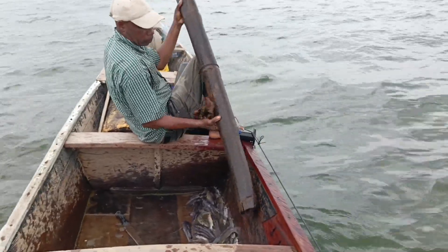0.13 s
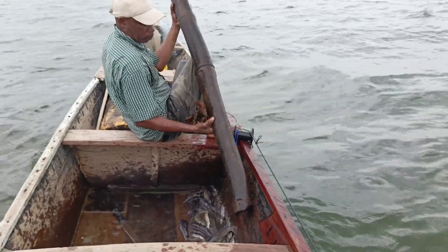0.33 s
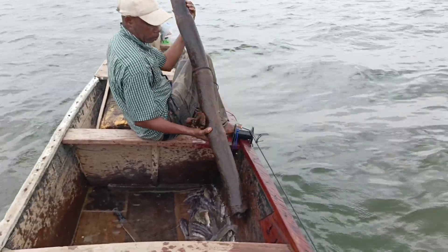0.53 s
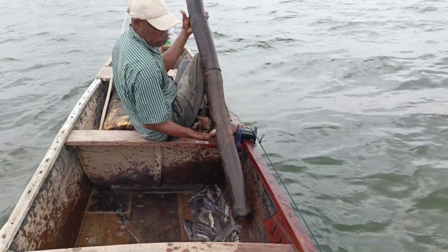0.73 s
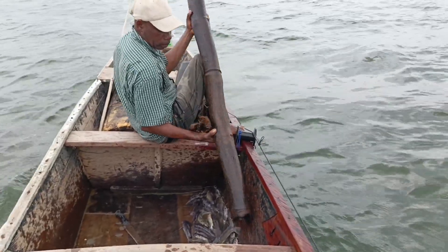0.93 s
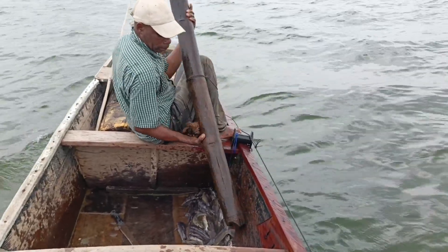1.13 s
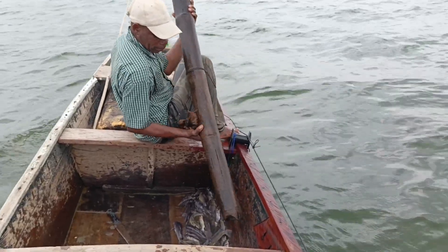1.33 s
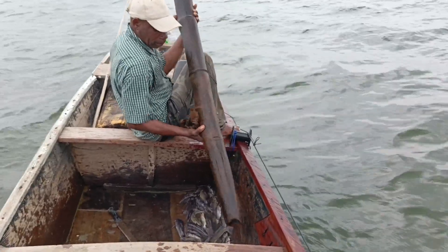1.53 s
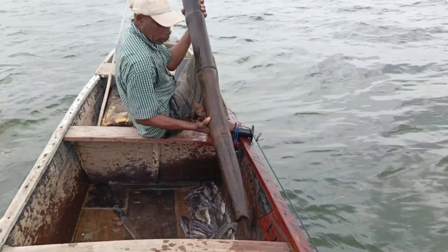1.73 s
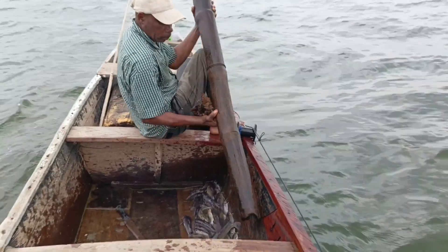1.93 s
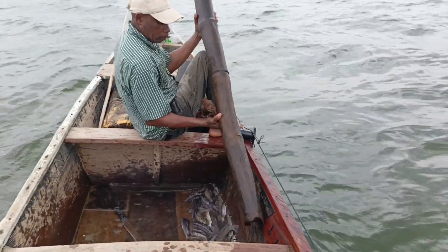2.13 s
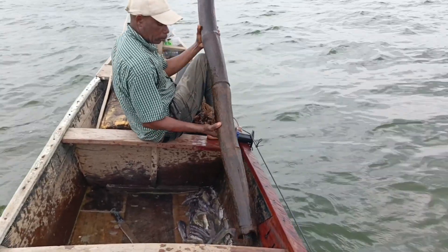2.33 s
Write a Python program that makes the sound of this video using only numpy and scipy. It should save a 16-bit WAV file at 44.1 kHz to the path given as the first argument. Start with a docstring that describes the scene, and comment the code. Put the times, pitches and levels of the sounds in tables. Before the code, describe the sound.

Pipe knocking on boat planks: one soft opening contact, a stretch of lapping, splashing and bubbling water, then a hard clattering knock and weaker grinding bumps, as low wind thumps swell on a small microphone outdoors.

```python
"""Pipe knocking in a canoe

A long pipe knocks and grinds on the planks of a wooden canoe: blows and grit drive decaying hull modes.
Small waves slap and splash in noise bursts, gulp in gliding sines and lap in patchy noise with tiny drops.
Fine spray hisses and ticks; gusts buffet the microphone with rumble and short, low wave-packet pops."""
import sys
import numpy as np
from scipy import signal
from scipy.fft import rfft, irfft
from scipy.io import wavfile
from scipy.ndimage import uniform_filter1d

SR = 44100
rng = np.random.default_rng(int(sys.argv[2]) if len(sys.argv) > 2 else 0)


def log_audio(samples):
    """Write samples as a 16-bit WAV file to the path given in sys.argv[1]."""
    # one column per channel
    frames = np.atleast_2d(samples).T
    # limit to full scale, then quantise
    limited = np.clip(frames, -1, 1)
    pcm = np.round(limited * 32767).astype(np.int16)
    wavfile.write(sys.argv[1], SR, pcm)


N = 104340  # length in samples


def amp(db):
    """Turns dB into linear amplitude."""
    return 10 ** (np.asarray(db) / 20)


def evened(x):
    """Scales a signal to unit RMS."""
    return x / np.sqrt(np.mean(x ** 2) + 1e-20)


def read(points, hz):
    """Reads a spectrum table along a logarithmic frequency axis."""
    f, value = np.transpose(points)
    return np.interp(np.log(hz + 1), np.log(f + 1), value)


def curve(points):
    """Draws a gain envelope through points of time and dB."""
    s, db = np.transpose(points)
    return amp(np.interp(np.arange(N) / SR, s, db))


def add(mix, s, sound):
    """Lays a sound into the mix from time s, cut at the end of the mix."""
    at = max(round(s * SR), 0)
    part = mix[at:at + len(sound)]
    part += sound[:len(part)]


def colour(x, db_of):
    """Shapes the spectrum of x by a dB rule of frequency, without phase shift."""
    return irfft(rfft(x) * amp(db_of(np.fft.rfftfreq(len(x), 1 / SR) + 1)), len(x))


def patchy(shape, patchy_db, flicker_db, size=512):
    """Coloured noise with drifting time-frequency patches and a flicker shared by all bands."""
    hz = np.fft.rfftfreq(size, 1 / SR)
    real, imaginary, c = rng.standard_normal((4 * N // size + 6, len(hz), 3)).T
    smooth = uniform_filter1d(c, size=6, axis=0)  # across frequency, then time
    patches = evened(uniform_filter1d(smooth, size=8, axis=1))
    flicker = evened(uniform_filter1d(c[0], size=4))
    level_db = read(shape, hz)[:, None] + patchy_db * patches + flicker_db * flicker
    z = (real + 1j * imaginary) * amp(level_db)
    return evened(signal.istft(z, nperseg=size, noverlap=3 * size // 4)[1][:N])


def hull_modes(t):
    """Hull and pipe resonances: decaying sines of alternating sign; returns their pitches and waves."""
    # resonances: f/Hz, relative level/dB, t60/s
    hull = [(225, 0, .05), (322, 2, .05), (452, 1, 0.1), (565, 0, 0.04), (668, 2, 0.045), (766, 2, 0.03),
            (1120, -6, 0.03), (1303, -4, 0.045), (1500, -6, 0.015), (1735, -2, 0.022), (2030, -5, 0.012),
            (2552, -8, 0.015), (3208, -8, 0.012)]
    modes = []
    for k, (hz, db, t60) in enumerate(hull):
        ring = amp(db - 60 * t / t60) * np.sin(2 * np.pi * hz * t)
        modes.append((-1) ** k * ring / np.sqrt(t60))
    return np.transpose(hull)[0], np.array(modes) / np.linalg.norm(modes)


def knock_drive(t, contact, t60):
    """Excitation of a knock: a sharp blow, gritty contact noise, then a lumpy rattle."""
    grit_spread_db, touch_bass = 3, 0.42
    rattle_db, treble_decay = -11.5, 0.97  # rattle treble dies in 0.97 of the time
    blow_db, blow_t60 = 5.5, 0.0016  # dB, s
    a, b, c = rng.standard_normal((3, len(t)))
    lumps = amp(grit_spread_db * evened(uniform_filter1d(c, size=90)))
    touch = a - (1 - touch_bass) * uniform_filter1d(a, size=30)
    touch = touch * np.exp(-(t / contact) ** 2)
    low = uniform_filter1d(b, size=16)
    after = np.maximum(t - contact, 0) / t60
    rattle = low * lumps * amp(-60 * after) + (b - low) * amp(-60 * after / treble_decay)
    rattle = rattle * amp(rattle_db) * np.minimum(t / contact, 1)
    blow = amp(blow_db - 60 * t / blow_t60)
    return touch * np.sqrt(lumps) + rattle + blow


def knocks():
    """Pipe on planks: each contact rings the modes near its struck spot, with bare grit heard beside them."""
    # knocks: t/s, relative level/dB, contact/s, tilt/dB per octave, rattle t60/s, favoured f/Hz
    hits = [(0.0, -30, 0.017, -2.5, 0.19, 322), (1.557, -53.5, 0.011, 2, 0.035, 2080),
            (1.574, -39.5, 0.024, -5.5, .05, 730), (1.5829, -17.5, 0.01, 2, 0.14, 1640),
            (1.591, -21.5, 0.005, -0.5, 0.098, 780), (1.601, -28, 0.0014, -6.5, 0.091, 664),
            (1.612, -25, 0.0027, -2, 0.12, 1360), (1.621, -43, 0.0052, -6, 0.074, 690),
            (1.631, -35.5, 0.0043, -4, 0.17, 1500), (1.712, -30, 0.008, -3, 0.14, 320),
            (1.739, -38.5, 0.0099, -1, 0.16, 2030), (1.819, -24.5, 0.0035, -5.5, 0.18, 2200),
            (1.825, -26.5, 0.0092, -1.5, 0.26, 314), (2.024, -37, 0.01, -3.5, 0.15, 1280),
            (2.032, -31.5, 0.0042, -5.5, 0.39, 438), (2.247, -39, 0.02, -4, 0.47, 696),
            (2.28, -38.5, 0.0082, -1.5, 0.41, 1120)]
    # colour of the bare contact: f/Hz, relative level/dB
    grit_colour = [(100, -49), (200, 14), (350, -15), (800, 2.5), (1800, 4.5), (3500, 0), (6000, -12),
                   (10000, -7.5), (16000, -3)]
    spot_db, grit_db = 10, 3
    t, out = np.arange(SR // 3) / SR, np.zeros(N)
    mode_hz, modes = hull_modes(t)
    pad = 256  # room for the zero-phase colouring
    for s, db, contact, tilt_db, t60, spot_hz in hits:
        boost_db = spot_db * np.exp(-(4 * np.log2(mode_hz / spot_hz)) ** 2)
        body = amp(boost_db) @ modes
        drive = np.pad(knock_drive(t, contact, t60), (pad, pad))
        ringing = signal.oaconvolve(drive, body)[:len(drive)]
        grit = amp(grit_db) * colour(drive, lambda f: read(grit_colour, f))
        # spectral tilt, with the bass held back
        sound = colour(ringing + grit,
                       lambda f: tilt_db * np.log2(f / 1000 + 0.086) - 30 / (1 + (f / 140) ** 4))
        add(out, s, amp(db) * sound[pad - 20:])  # a 20-sample lead-in stays
    return out


def splashes():
    """Water slaps: short grainy noise bursts, each around its own centre, with fine spray on top."""
    # slaps and splashes: t/s, relative level/dB, centre f/Hz, relative spray level/dB, t60/s
    slaps = [(0.0754, -61, 1800, -75, 0.28), (0.1568, -43.5, 2120, -72, 0.047),
             (0.2027, -31, 1900, -60, 0.097), (0.2217, -28, 2240, -89, 0.042),
             (0.283, -27.5, 2000, -52, 0.066), (0.3132, -26, 2400, -70, 0.028),
             (0.341, -36, 1550, -79, 0.056), (0.375, -30, 1400, -84, 0.068),
             (0.3977, -40, 1500, -74, 0.047), (0.4232, -45, 1590, -80, 0.09), (0.46, -39, 1880, -73, 0.11),
             (0.58, -32, 2430, -56, 0.047), (0.6058, -34.5, 2210, -72, 0.25), (0.65, -32, 3040, -83, 0.068),
             (0.8317, -31, 1980, -68, 0.077), (0.9716, -29.5, 1580, -75, 0.03),
             (0.986, -34.5, 1800, -52.5, 0.12), (1.0215, -29.5, 3080, -80, 0.12),
             (1.0683, -57, 2870, -49, 0.022), (1.0947, -32, 1310, -78, 0.14), (1.1316, -42, 1610, -82, 0.2),
             (1.15, -40, 1820, -86, 0.13), (1.2254, -40.5, 1870, -82, 0.72),
             (1.3558, -25.5, 1900, -57.5, 0.092), (1.384, -57, 1530, -72, 0.045),
             (1.6775, -40, 1620, -64, 0.055), (1.955, -29.5, 2110, -47.5, 0.054),
             (1.9946, -36, 1500, -71, 0.02), (2.091, -28, 3080, -54, 0.21), (2.1286, -32, 1840, -63, 0.3),
             (2.3038, -30.5, 1800, -52, 0.1)]
    width_octaves, wet_db, rise_s = 0.72, -12.5, 0.0012
    t, out = np.arange(SR // 5) / SR, np.zeros(N)
    for s, db, hz, spray_db, t60 in slaps:
        a, b, c = rng.standard_normal((3, len(t)))
        grains = amp(1.3 * evened(uniform_filter1d(c, size=60)))
        wet = evened(colour(a * grains,
                            lambda f: -9 * np.log1p((np.log2(f / hz) / width_octaves) ** 2)))
        fine = evened(colour(b, lambda f: -30 / (1 + (f / 6500) ** 6)))
        fade = np.minimum(t / rise_s, 1) * amp(-60 * t / t60)
        fine_gain = amp(spray_db + 16 - 30 * t / t60)  # spray fades faster than the slap
        add(out, s, fade * (amp(db + wet_db) * wet + fine_gain * fine))
    return out


def bubble(hz, rise, t60):
    """A bubble: a gliding, slightly wobbling sine that decays and is faded out at its end."""
    rise_s, life_s, wobble_depth = 0.00027, 0.045, 0.045  # life_s is the longest
    t = np.arange(0, min(life_s, t60 / 2), 1 / SR)
    wobble = evened(uniform_filter1d(rng.standard_normal(SR // 10), size=80))[:len(t)]
    fade = np.minimum(t / rise_s, 1) * amp(-60 * t / t60)
    fade = fade * np.minimum((t[-1] - t) / 0.011, 1)
    pitch = (hz + rise * t) * (1 + wobble_depth * wobble)
    return fade * np.sin(2 * np.pi * np.cumsum(pitch) / SR)


def bubbles():
    """The larger gulps and drips along the hull, one gliding sine each."""
    # bubbles: t/s, start f/Hz, glide/Hz per s, level/dB, t60/s
    gulps = [(.159, 2230, 5006, -33.5, 0.019), (0.175, 507, 14000, -26.5, 0.066),
             (.265, 760, 8995, -47, 0.036), (.342, 407, 1988, -35, 0.057), (.345, 833, 998, -40, 0.15),
             (0.398, 1440, 4000, -38, 0.084), (0.434, 1750, 3000, -37.5, 0.03), (.82, 289, 1500, -37, 0.11),
             (.201, 2100, 2998, -38, 0.028), (0.227, 1020, 8000, -29, 0.025),
             (.229, 356, 9002, -28.5, 0.28), (0.315, 2440, -9000, -33.5, 0.035),
             (0.374, 368, 9000, -23.5, 0.023), (.403, 703, 2999, -36.5, 0.074),
             (.422, 777, 2005, -36.5, 0.066), (0.422, 1610, 3000, -34, 0.03),
             (0.457, 1220, 6000, -32, 0.038), (0.46, 1896, 2998, -40, 0.054),
             (.474, 468, 1500, -33.5, 0.068), (.529, 724, 6008, -32, 0.062),
             (.671, 2260, 3000, -34.5, 0.031), (1.017, 2540, 150006, -33.5, 0.027),
             (1.021, 3734, 149996, -34, 0.033), (0.65, 3330, 60000, -30.5, 0.026),
             (1.213, 1003, 2000, -34.5, 0.055), (1.45, 500, 6987, -43, 0.21),
             (1.655, 3040, 1000, -33, 0.021), (1.78, 600, 5005, -19.5, 0.025),
             (1.895, 671, -1500, -30, 0.11), (2.206, 1235, 3987, -42, 0.055),
             (2.342, 1390, 4001, -35, 0.019)]
    out = np.zeros(N)
    for s, hz, rise, db, t60 in gulps:
        add(out, s, amp(db) * bubble(hz, rise, t60))
    return out


def lapping():
    """Lapping water: patchy wash plus a random scatter of tiny rising drops under one swelling level."""
    # swell of the lapping: t/s, relative level/dB
    swell = [(0.0, -59), (0.22, -53.5), (0.34, -48.5), (0.45, -53), (0.64, -50), (0.78, -54), (1.24, -55),
             (1.43, -56), (1.5, -62.5), (1.65, -62.5), (1.76, -43.5), (1.95, -53), (2.08, -54.5),
             (2.37, -64.5)]
    # colour of wash and drops: f/Hz, relative level/dB
    lap_colour = [(100, -14), (350, 0.5), (600, 2.5), (1400, -0.5), (3000, -5.5), (6000, -19.5),
                  (10000, -22.5), (16000, -9)]
    drops_per_s, drops_db = 700, 1
    size = amp(3.7 * np.minimum(rng.exponential(1, N), 4))
    size = size * (rng.random(N) < drops_per_s / SR)
    kind, drops = rng.integers(0, 24, N), np.zeros(N)
    for k, hz in enumerate(np.geomspace(350, 5500, num=24)):
        drop = amp(read(lap_colour, hz)) * np.sqrt(hz) * bubble(hz, 9 * hz, 22 / hz)
        drops += signal.oaconvolve(size * (kind == k), drop)[:N]
    wash = patchy(lap_colour, patchy_db=5.5, flicker_db=1.5)
    return curve(swell) * (wash + amp(drops_db) * evened(drops))


def spray():
    """Fine hiss of far water as patchy treble noise, and spray ticks as brief bursts of sharpened noise."""
    # swell of the hiss: t/s, relative level/dB
    hiss_swell = [(0.0, -61), (0.17, -61.5), (0.41, -97), (0.93, -70.5), (1.16, -67), (1.58, -71.5),
                  (1.74, -62), (1.99, -78), (2.07, -57.5), (2.24, -69), (2.37, -65)]
    # spray ticks: t/s, relative level/dB
    spray_ticks = [(0.1983, -48), (0.351, -67), (0.408, -64), (1.2185, -60), (1.2537, -59), (1.3335, -64),
                   (1.4122, -62), (1.453, -64), (1.4652, -61.5)]
    tick_db, tick_t60 = -1.5, 0.014  # dB, s
    hiss_colour = [(3000, 5.5), (7000, -8.0), (16000, 5.5)]  # f/Hz, relative level/dB
    t = np.arange(SR // 20) / SR
    out = curve(hiss_swell) * patchy(hiss_colour, patchy_db=1.5, flicker_db=1.5, size=256)
    for s, db in spray_ticks:
        sharp = np.diff(rng.standard_normal(len(t) + 2), 2)  # differencing lifts the treble
        add(out, s, amp(db + tick_db - 60 * t / tick_t60) * sharp)
    return amp(11.0) * out


def wind():
    """Wind on the microphone: lumpy rumble, and eddies that push the diaphragm for a turn or two."""
    # swell of the rumble: t/s, level/dB
    gusts = [(0.04, -38), (0.07, -49), (0.17, -37.5), (0.35, -58), (0.39, -38.5), (0.48, -44), (0.51, -46),
             (0.63, -37), (0.67, -51), (0.76, -56), (0.78, -46.5), (1.01, -46), (1.51, -46.5), (1.55, -43),
             (1.71, -43.5), (1.77, -30.5), (1.79, -41), (1.88, -27), (1.95, -38.5), (1.97, -49.5),
             (2.128, -48), (2.142, -35.5), (2.21, -27.5), (2.32, -40.5), (2.34, -25), (2.37, -30)]
    # colour of the rumble: f/Hz, relative level/dB
    wind_colour = [(25, -29), (50, -27.5), (100, 14.5), (160, -7.5), (250, -5.5), (400, -16.5), (800, -60)]
    # wind pops: centre t/s, relative level/dB, f/Hz
    pops = [(0.046, -27, 152), (0.208, -32.5, 160), (0.303, -28.5, 161), (0.319, -30, 135),
            (0.362, -28, 120), (0.579, -29.5, 143), (0.622, -22.5, 162), (0.821, -53, 144),
            (0.956, -33.5, 121), (0.975, -32, 118), (1.006, -29.5, 123), (1.261, -25.5, 166),
            (1.641, -26, 210), (1.767, -34, 119), (1.855, -36, 211), (1.875, -22, 211), (1.887, -18, 184),
            (1.905, -32, 101), (1.918, -31, 183), (1.926, -23.5, 177), (1.943, -24, 116), (2.065, -37, 239),
            (2.142, -13, 164), (2.154, -14.5, 182), (2.165, -13, 153.5), (2.181, -21.5, 193),
            (2.197, -15, 145), (2.216, -19.5, 118), (2.232, -21.5, 117), (2.243, -15.5, 234),
            (2.254, -24.5, 264), (2.268, -24.5, 237), (2.28, -27.5, 142), (2.34, -35, 133),
            (2.352, -25, 118)]
    pop_turns, pop_rise = 0.81, 0.52  # reach in cycles; share of it before the centre
    edge_ratio, edge_db = 1.9, -12  # a higher, softer partner sharpens each pop
    out = curve(gusts) * patchy(wind_colour, patchy_db=-0.5, flicker_db=3.5, size=1024)
    for (s, db, hz), start in zip(pops, rng.random(len(pops))):
        turns = np.arange(-SR // 40, SR // 40) / SR * hz
        reach = pop_turns * np.where(turns < 0, pop_rise, 1)
        push = np.zeros(len(turns))
        for k, part_db in [(1, 0), (edge_ratio, edge_db)]:
            swell = np.exp(-(k * turns / reach) ** 2)
            push += amp(part_db) * swell * np.cos(2 * np.pi * (k * turns + start))
        add(out, s - 1 / 40, amp(db) * push)
    return out


def scene():
    """Mixes the pipe, the water and the wind to one channel."""
    return (knocks() + splashes() + bubbles() + lapping() + spray() + wind())[None]


def record(dry):
    """Small microphone with a treble notch and port peaks; then a steep low-pass as the band limit."""
    # microphone response: f/Hz, level/dB
    response = [(25, -39), (50, -3.5), (100, 0.5), (5500, -1), (7000, -7.5), (8500, -23.5), (10000, -18),
                (11500, -14.5), (13500, -22.5), (15000, -17.5), (16500, -31)]
    edge_hz = 15950
    mic = colour(np.pad(dry[0], (0, 4096)), lambda f: read(response, f))[None, :N]
    low_pass = signal.firwin(511, edge_hz, window=("kaiser", 9), fs=SR)
    return signal.oaconvolve(mic, low_pass[None], "same")


dry = scene()
out = record(dry)
log_audio(out)
```